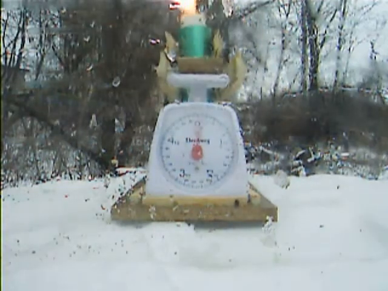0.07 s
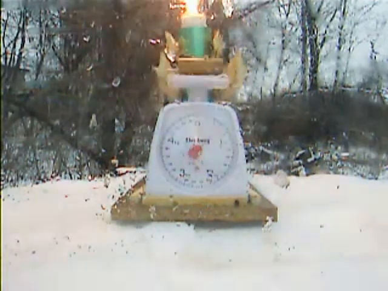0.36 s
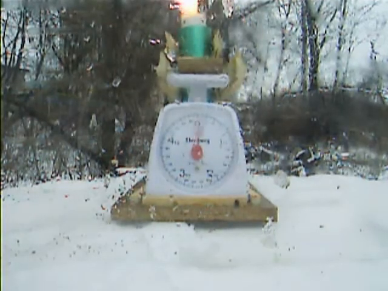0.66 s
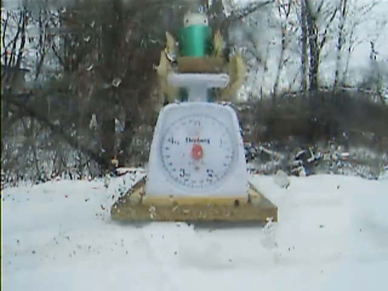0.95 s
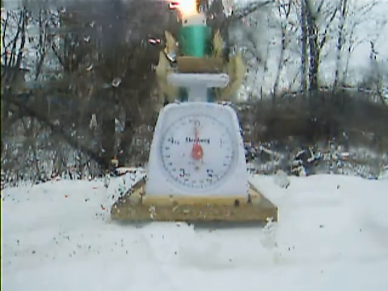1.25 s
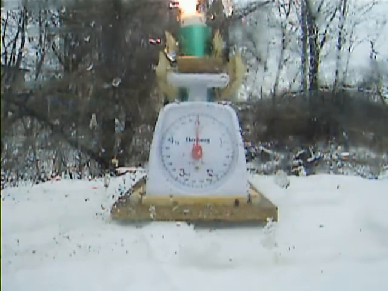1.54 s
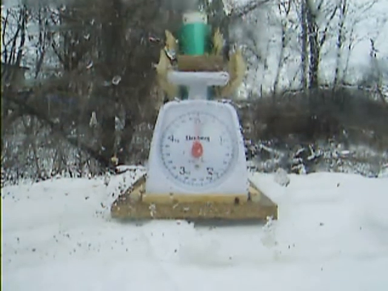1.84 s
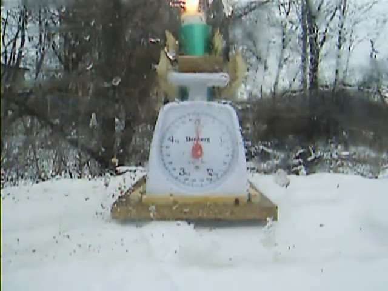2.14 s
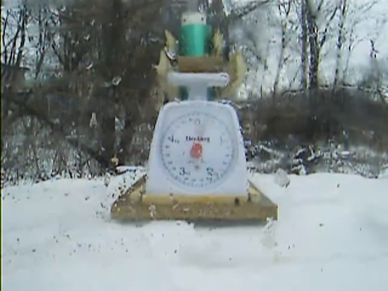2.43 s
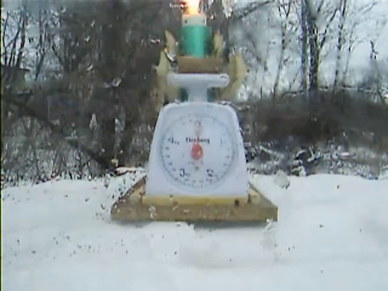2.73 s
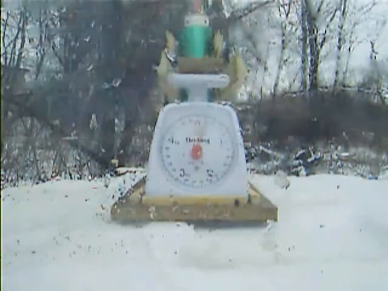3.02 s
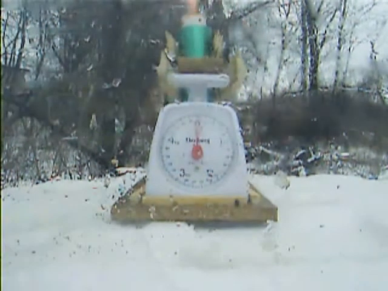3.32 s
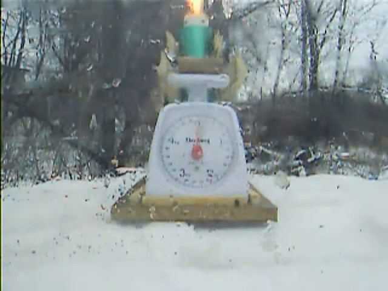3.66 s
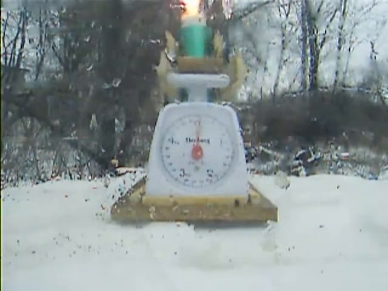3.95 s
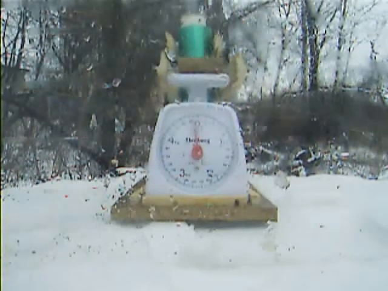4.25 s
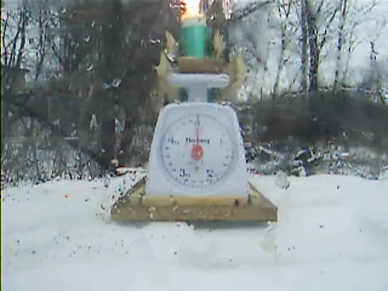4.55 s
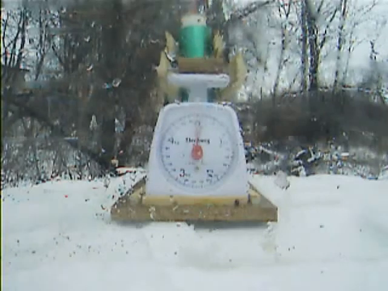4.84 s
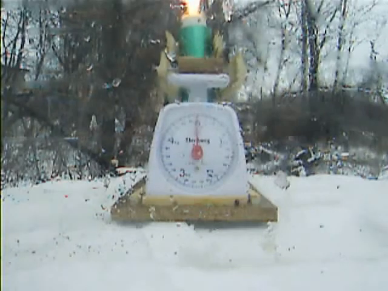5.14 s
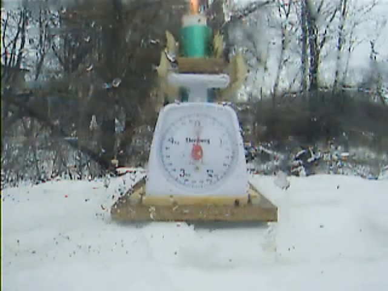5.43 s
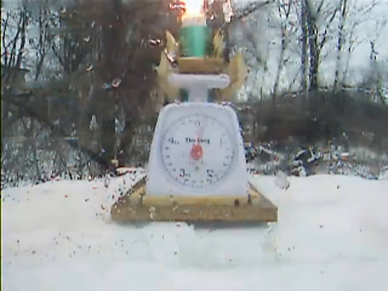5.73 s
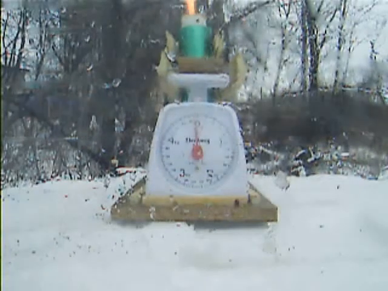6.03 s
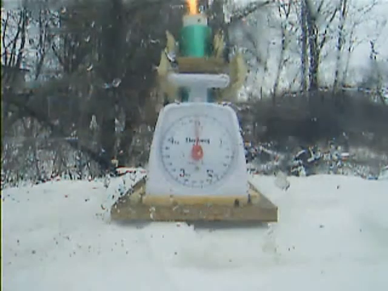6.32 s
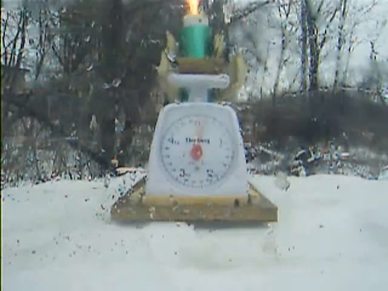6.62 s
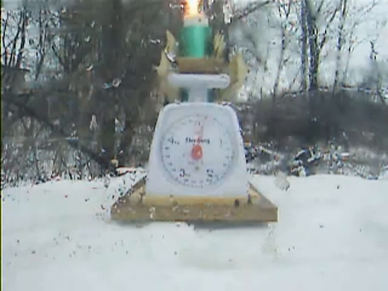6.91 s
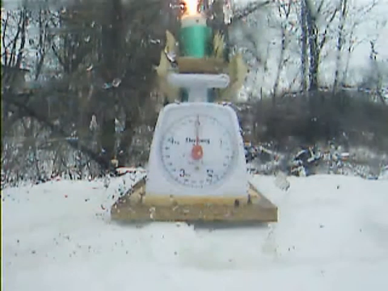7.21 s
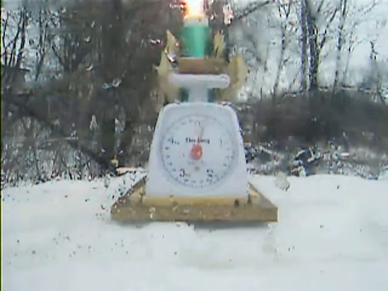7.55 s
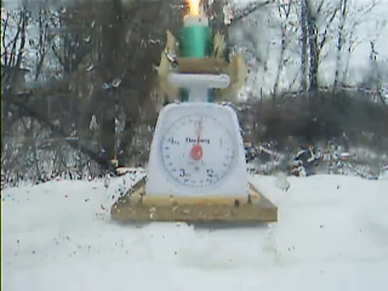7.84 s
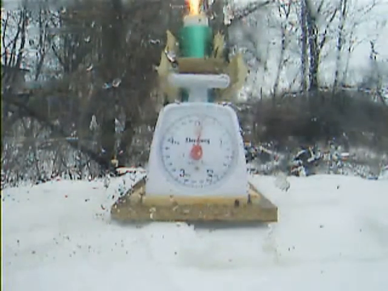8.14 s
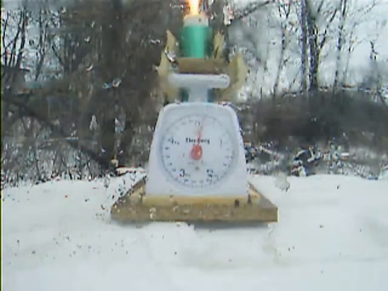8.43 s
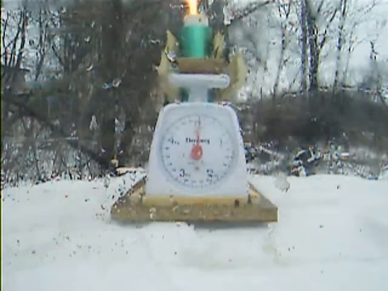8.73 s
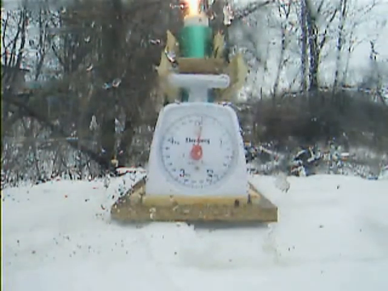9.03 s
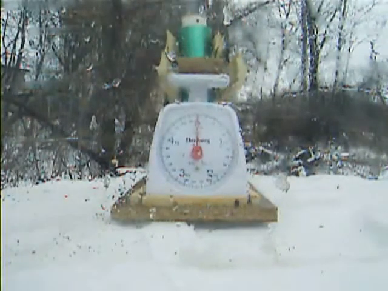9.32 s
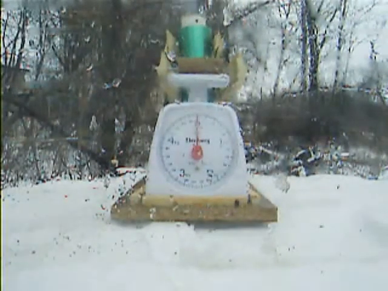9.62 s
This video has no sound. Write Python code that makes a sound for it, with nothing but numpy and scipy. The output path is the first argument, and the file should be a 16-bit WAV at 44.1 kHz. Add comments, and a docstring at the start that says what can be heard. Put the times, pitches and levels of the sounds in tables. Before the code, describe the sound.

Solid fuel burns in repeated chuffs in quiet snowy woods. Each one starts as a low sputtering flame, swells into a hissing, sizzling roar and collapses with a dull pop. The bursts come about half a second apart at first, then crowd together before a last sharp pop. A small nearby microphone dulls the treble and distorts slightly on the loudest peaks.

```python
"""Rocket fuel chuffing in snowy woods.

A plug of solid fuel burns in an open tube, in still air. Each chuff starts as a sputtering flame,
swells to a hissing jet and collapses with a pop; the chuffs crowd together until the fuel is spent.
A small microphone nearby rolls off above 4 kHz and clips on the loudest peaks."""
import sys
import numpy as np
from scipy import signal
from scipy.fft import rfft, irfft, next_fast_len
from scipy.io import wavfile

SR = 44100
rng = np.random.default_rng(int(sys.argv[2]) if len(sys.argv) > 2 else 0)


def store_wav(level_fs):
    """Save 16-bit WAV to argv[1]."""
    pcm = np.round(np.clip(np.atleast_2d(level_fs), -1, 1) * 32767)
    wavfile.write(sys.argv[1], SR, pcm.T.astype(np.int16))


N = 426447


def amp(db):
    """dB to gain."""
    return np.exp(np.asarray(db) * (np.log(10) / 20))


def unit_rms(x):
    """Scale to rms 1."""
    return x / np.sqrt(np.mean(x ** 2) + 1e-20)


def power_sum_db(levels_db):
    """Level of simultaneous sounds: powers add."""
    return 10 * np.log10(sum(amp(db) ** 2 for db in levels_db) + 1e-12)


def gate_db(t, start_s, end_s, attack_s, fall_db_per_s):
    """Attack, hold, release."""
    attack = np.clip((t - start_s) / attack_s, 1e-6, 1)
    return 20 * np.log10(attack) - fall_db_per_s * np.maximum(t - end_s, 0)


def curve_db(points, hz):
    """Interpolate a spectrum over log frequency."""
    points_hz, db = np.transpose(points)
    return np.interp(np.log(hz + 1), np.log(points_hz), db)


def filtered(x, gain_db):
    """Zero-phase filter with response gain_db(hz)."""
    size = next_fast_len(N, real=True)
    grid_hz = np.linspace(0, np.sqrt(SR / 2), 3000) ** 2
    gain = np.interp(np.fft.rfftfreq(size, 1 / SR), grid_hz, amp(gain_db(grid_hz)))
    return irfft(rfft(x, size) * gain, size)[..., :N]


def flutter(rate_hz, size=8192):
    """Smooth random drift, rms 1, rolled off at rate_hz."""
    hz = np.fft.rfftfreq(size, N / SR / size)
    slow = irfft(rfft(rng.standard_normal(size)) * np.exp(-(hz / rate_hz) ** 2))
    return unit_rms(np.interp(np.arange(N) * size / N, np.arange(size), slow))


def turbulence(rate_hz, depth_db):
    """Noise that comes in lumps as eddies pass."""
    return unit_rms(rng.standard_normal(N) * amp(depth_db * flutter(rate_hz)))


# Peaks and dips common to all sources: f/Hz, width/Hz, gain/dB
COLOUR_BELLS = [(151, 13, 3.5), (185, 25, -1.5), (285, 25, 2), (365, 45, -4.8), (460, 38, 4.8),
                (528, 18, 1.5), (660, 60, 2.5), (820, 35, 1.5), (925, 90, -7), (1055, 40, -3),
                (1168, 28, 2.5), (1235, 40, -1.5), (1345, 55, 4.3), (1455, 85, 6), (1625, 25, 2),
                (2450, 160, -1.5), (3280, 60, 1.5), (3440, 70, -1), (3660, 70, 2.5)]


def colour_db(hz):
    """Colour of all that reaches the microphone: a sum of bell curves."""
    return sum(db * np.exp(-((hz - centre_hz) / width_hz) ** 2)
               for centre_hz, width_hz, db in COLOUR_BELLS)


def shaped(x, spectrum):
    """Apply a source spectrum and the common colour; rms 1."""
    return unit_rms(filtered(x, lambda hz: curve_db(spectrum, hz) + colour_db(hz)))


def ring(x, size=4096):
    """Apply the common colour at minimum phase, so a pulse rings after it strikes."""
    log_gain = np.log(amp(colour_db(abs(np.fft.fftfreq(size, 1 / SR)))))
    response = np.fft.ifft(np.exp(np.conj(signal.hilbert(log_gain)))).real
    return signal.oaconvolve(x, response)[:len(x)]


# Tongues of flame: catch t/s, blow-out t/s, start level/dB, end level/dB
FLAME_BURNS = [(0.0, 0.376, -25.5, -16.5), (0.515, 0.898, -24.5, -16.5), (1.037, 1.252, -32, -29.5),
               (1.254, 1.803, -20.5, -15.5), (1.854, 2.349, -21.5, -20.5), (2.529, 3.006, -25.5, -23.5),
               (2.77, 2.794, -17, -20.7), (3.19, 3.66, -23.9, -20), (3.741, 4.129, -26.0, -24),
               (4.085, 4.12, -9.5, -18.5), (4.208, 4.777, -24, -20), (4.712, 4.744, -22.8, -13.6),
               (4.905, 5.458, -25, -24), (5.304, 5.367, -14.5, -28.0), (5.457, 5.901, -26, -23),
               (5.807, 5.88, -21.5, -29.5), (5.953, 6.376, -26, -21), (6.216, 6.314, -16, -18),
               (6.499, 6.538, -11.5, -15), (6.597, 6.72, -17, -16), (6.815, 7.109, -24.5, -19.5),
               (6.992, 7.079, -18.6, -29), (7.113, 7.771, -27.5, -23.6), (7.825, 8.105, -21, -32),
               (8.09, 8.339, -20, -19), (8.117, 8.159, -14.5, -18.1), (8.507, 8.639, -28, -20),
               (8.641, 8.788, -14, -18.5), (8.793, 9.077, -38, -23), (9.13, 9.219, -26.5, -17)]


def flame_level_db(t, surge_db, feed_db=-9.0, feed_slope=0.72):
    """Each flame catches, grows or wanes, and is snuffed; gas surges feed the fire."""
    burns_db = []
    for catch_s, out_s, start_db, end_db in FLAME_BURNS:
        ramp_db = np.interp(t, [catch_s, out_s], [start_db, end_db])
        burns_db.append(ramp_db + gate_db(t, catch_s, out_s, attack_s=0.012, fall_db_per_s=800.5))
    return power_sum_db(burns_db + [feed_db + feed_slope * surge_db])


# Flame spectra, lazy and jet-driven: f/Hz, level/dB
LAZY_SPECTRUM = [(20, -26), (45, -17), (80, -6), (130, -1.5), (210, -1.5), (300, -6.5), (450, -18),
                 (800, -29.5), (1500, -42.5), (4000, -52)]
DRIVEN_SPECTRUM = [(20, -17), (45, -17), (80, -11), (140, -3.5), (240, -2), (330, -3.5), (500, -5),
                   (800, -17.5), (1500, -32.5), (4000, -49)]


def flame(flame_db, jet_db, crossover_db=-29, width_db=12, lumps_per_s=55):
    """A lazy flame sputters in deep lumps; the jet drives it to a higher, steadier rumble."""
    lump_count = np.cumsum(lumps_per_s * np.exp(0.5 * flutter(rate_hz=60))) / SR
    lump_onsets = np.diff(np.floor(lump_count), prepend=0)
    lumps = unit_rms(lump_onsets * rng.uniform(0.19, 1, N))
    sputter = shaped(turbulence(rate_hz=49, depth_db=2) + amp(-3) * lumps, LAZY_SPECTRUM)
    rumble = shaped(turbulence(rate_hz=94, depth_db=2), DRIVEN_SPECTRUM)
    driven = 0.5 + 0.5 * np.tanh((jet_db - crossover_db) / width_db)
    blend = amp(-2.5) * np.sqrt(1 - driven) * sputter + amp(-1) * np.sqrt(driven) * rumble
    return amp(flame_db) * blend


# Background spectrum: f/Hz, level/dB
AIR_SPECTRUM = [(20, -22), (60, -11), (150, 1), (230, -0.5), (450, -7), (700, -11), (920, -9),
                (1400, -15.5), (2500, -10.5), (4000, -17.5)]


def air(level_db=-40.5):
    """Faint outdoor background with a flickering level."""
    return amp(level_db) * shaped(turbulence(rate_hz=9, depth_db=4.5), AIR_SPECTRUM)


# Spectrum where jet and flame mix: f/Hz, level/dB
ROAR_SPECTRUM = [(60, -35.5), (200, -16.5), (330, -9.5), (480, 0), (720, -2.5), (1000, -20), (1600, -12),
                 (4000, -57)]


def roar(flame_db, jet_db, jet_share=0.59, gain_db=-2.5):
    """The jet stirs the flame: the roar grows with both."""
    drive_db = jet_share * jet_db + (1 - jet_share) * flame_db
    return amp(drive_db + gain_db) * shaped(turbulence(rate_hz=150, depth_db=3), ROAR_SPECTRUM)


# Gas surges: crest t/s, level/dB, 20 dB swell/s, 20 dB collapse/s
GAS_CHUFFS = [(0.329, -14, 0.171, 0.0166), (0.843, -16.5, 0.17, 0.01), (1.735, -12, 0.27, 0.0566),
              (2.253, -15, 0.1443, 0.0549), (2.923, -13, 0.2232, 0.0674), (3.564, -12.5, 0.13, 0.1033),
              (4.033, -13.5, 0.1553, 0.084), (4.64, -13, 0.2263, 0.133), (5.248, -14, 0.21, 0.129),
              (5.702, -17, 0.23, 0.179), (6.132, -16, 0.118, 0.19), (6.491, -15, 0.13, 0.19),
              (6.82, -13.5, 0.095, 0.19), (7.254, -12, 0.11, 0.003), (7.522, -17.9, 0.58, 0.42),
              (7.703, -10.5, 0.0452, 0.06), (7.996, -16.5, 0.142, 0.26), (8.285, -15, 0.133, 0.07),
              (8.535, -16.5, 0.231, 0.1), (8.828, -12, 0.086, 0.0277), (9.066, -16.0, 0.92, 0.0028),
              (9.126, -23.0, 0.1, 0.13)]
# Spurts at a crest or as a last gasp: t/s, length/s, level/dB
GAS_SPURTS = [(0.3, 0.021, -14.5), (0.334, 0.035, -21.5), (.806, .048, -14.5), (.856, .032, -25.5),
              (2.239, .052, -12), (2.295, 0.047, -26), (2.805, .022, -20), (2.9, .04, -17),
              (2.94, .045, -25), (3.972, 0.053, -17), (4.049, 0.047, -24.5), (4.599, .03, -18),
              (5.216, .034, -14), (5.637, .021, -18.5), (5.701, .023, -12.5), (6.112, 0.034, -15.5),
              (6.18, .043, -16), (6.484, .03, -16), (6.827, .012, -12.5), (6.853, 0.032, -18),
              (7.283, .053, -17.5), (7.456, .054, -14.5), (7.734, 0.018, -15), (7.977, .04, -11.5),
              (8.295, .014, -12.5), (8.518, .035, -17), (9.016, 0.052, -16.5)]


def gas_levels_db(t, rounding_s=0.013, collapse_power=1.62, smoulder_db=-25, fade_db_per_s=33):
    """Chuffs swell, collapse ever faster, then smoulder. Returns surges alone and the whole jet."""
    surges, embers = [], []
    for crest_s, crest_db, swell_s, collapse_s in GAS_CHUFFS:
        before_s, after_s = np.maximum(crest_s - t, 0), np.maximum(t - crest_s, 0)
        swell_db = crest_db - 20 * (np.hypot(before_s, rounding_s) - rounding_s) / swell_s
        surges.append(swell_db - 20 * (after_s / collapse_s) ** collapse_power)
        embers.append(swell_db + smoulder_db - fade_db_per_s * after_s)
    spurts = [db + gate_db(t, start_s, start_s + length_s, attack_s=0.003, fall_db_per_s=1500)
              for start_s, length_s, db in GAS_SPURTS]
    return power_sum_db(surges), power_sum_db(surges + embers + spurts)


# Jet spectrum: f/Hz, level/dB
HISS_SPECTRUM = [(100, -18), (400, -1.5), (800, 1.5), (1300, 3.5), (2000, 0.5), (2800, -0.5), (3800, -4.5),
                 (5000, -7)]


def jet(jet_db, gain_db=1.07, grains_per_s=900, grain_db=-10, spread_db=4):
    """Escaping gas hisses, with a fine sizzle of bursting fuel grains."""
    sizes = amp(spread_db * np.minimum(rng.exponential(1, N), 4))
    signs = rng.choice([-1, 1], N)
    grains = unit_rms(sizes * signs * (rng.random(N) < grains_per_s / SR))
    gas = turbulence(rate_hz=130, depth_db=1.55) + amp(grain_db) * grains
    return amp(jet_db + gain_db) * shaped(gas, HISS_SPECTRUM)


# Pops as the flame catches or blows out: t/s, level/dB, centre f/Hz
GAS_POPS = [(0.369, -6.5, 151), (0.533, -19.5, 175), (0.887, -8.5, 154), (1.768, -5, 266),
            (1.794, -11, 121), (1.862, -14, 147), (1.963, -12.5, 234), (2.341, -9, 159), (2.46, -16.5, 156),
            (2.783, -5, 145), (2.825, -3.5, 270), (2.993, -13, 88.8), (3.13, -15, 105), (3.196, -26, 144),
            (3.227, -17.5, 224), (3.277, -15.5, 171), (3.331, -15.5, 129), (3.608, -13.5, 256),
            (3.767, -15, 130), (4.106, -8, 280), (4.216, -17.5, 99.6), (4.282, -14, 156), (4.683, -10, 132),
            (4.738, -4.5, 159), (4.914, -16, 105), (4.939, -15, 132), (5.227, -2.5, 198), (5.329, -5, 170),
            (5.439, -16, 104.5), (5.653, -5, 275), (5.744, 0, 229), (5.997, -17, 237), (6.255, -3, 258),
            (6.299, -10, 156), (6.364, -10.5, 164), (6.531, -2, 156), (6.672, -8.5, 149), (6.714, -14, 118),
            (7.084, -10, 272), (7.252, -6.5, 223), (7.338, -11, 148), (7.901, -15, 144), (8.135, -10, 213),
            (8.302, -11, 320), (8.33, -9.5, 140), (8.585, -0.5, 229), (9.069, -2, 275)]


def pops(pulse_lag_ms=2.34, pulse_db=-2, puff_db=-12, puff_decay_ms=7, half_span=2000):
    """A gas pocket flares: a pressure push, a pull, and a short puff of roar."""
    pulses, puff_envelope = np.zeros(N), np.zeros(N)
    t_ms = np.arange(-half_span, half_span) / SR * 1000
    puff_shape = np.clip(t_ms, 0, 1) * np.exp(-abs(t_ms) / puff_decay_ms)
    for onset_s, db, hz in GAS_POPS:
        onset = round(onset_s * SR)
        span = slice(onset - half_span, onset + half_span)
        phase = 2 * np.pi * hz * (t_ms - pulse_lag_ms) / 1000
        pulses[span] -= amp(db + pulse_db) * phase * np.exp((1 - phase ** 2) / 2)
        puff_envelope[span] += amp(db + puff_db) * puff_shape
    return ring(pulses) + puff_envelope * shaped(rng.standard_normal(N), ROAR_SPECTRUM)


def woods_echo(x, gain_db=-27.5, t60_s=2.2, rise_s=0.083):
    """Trunks and branches scatter back a faint, diffuse tail."""
    t = np.arange(SR) / SR
    tail = rng.standard_normal(SR) * amp(-60 * t / t60_s) * (1 - np.exp(-t / rise_s))
    return amp(gain_db) * signal.fftconvolve(x, tail / np.linalg.norm(tail))[:N]


def scene(throb_hz=20, throb_db=1.0):
    """Burning fuel and its echo over the background; mono."""
    t = np.arange(N) / SR
    control_t = t[::64]
    surge_db, gas_db = gas_levels_db(control_t)
    jet_db = np.interp(t, control_t, gas_db)
    flame_db = np.interp(t, control_t, flame_level_db(control_t, surge_db))
    flame_db += throb_db * flutter(throb_hz)
    fire = flame(flame_db, jet_db) + roar(flame_db, jet_db) + jet(jet_db) + pops()
    return (fire + air() + woods_echo(fire))[None]


def amplifier_sag(x, depth=0.031, onset_db=-15, hold_s=0.06):
    """Sustained loud sound briefly drags the amplifier's zero line down."""
    pole = np.exp(-1 / (hold_s * SR))
    load = signal.lfilter([1 - pole], [1, -pole], x ** 2) / amp(onset_db) ** 2
    return -depth * np.tanh(load ** 2)


def soft_clip(x, knee=0.57, ceiling=0.72):
    """Linear below the knee, bending towards the ceiling above."""
    margin = ceiling - knee
    excess = np.maximum(abs(x) - knee, 0)
    return x + np.sign(x) * (margin * np.tanh(excess / margin) - excess)


# Microphone treble roll-off: f/Hz, gain/dB
MIC_ROLLOFF = [(3800, 0.5), (4000, -4.5), (4200, -10.5), (4400, -22), (4550, -36.5), (4750, -83)]


def record(dry, headroom=1.074, cutoff_hz=15900):
    """The microphone rounds peaks and narrows the band; overshoots spit as they clip."""
    rounded = headroom * np.tanh(dry / headroom)
    narrow = filtered(rounded, lambda hz: curve_db(MIC_ROLLOFF, hz))
    clipped = soft_clip(narrow + amplifier_sag(narrow))
    lowpass = signal.firwin(511, cutoff_hz, window=("kaiser", 9), fs=SR)
    return signal.oaconvolve(clipped, lowpass[None], "same")


dry = scene()
out = record(dry)
store_wav(out)
```